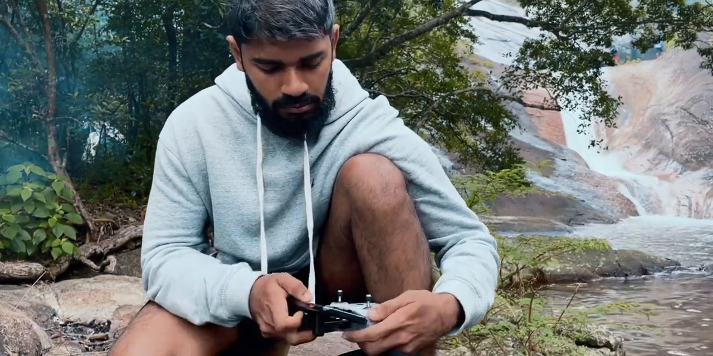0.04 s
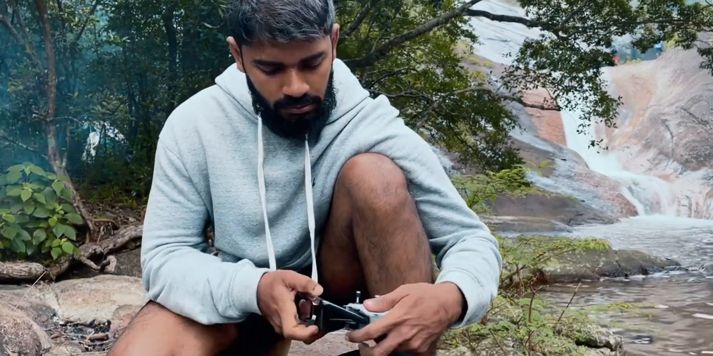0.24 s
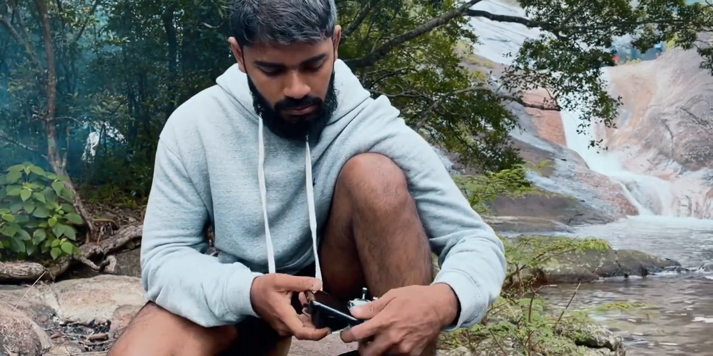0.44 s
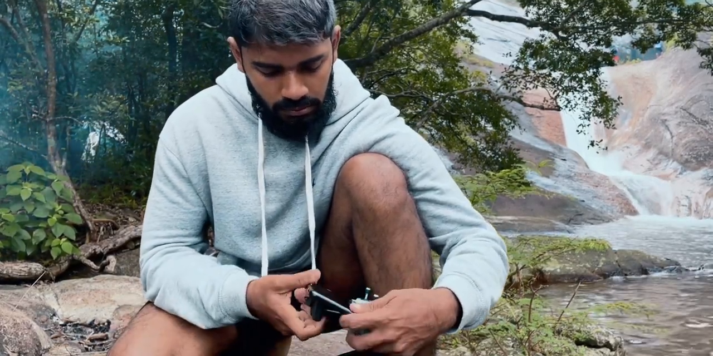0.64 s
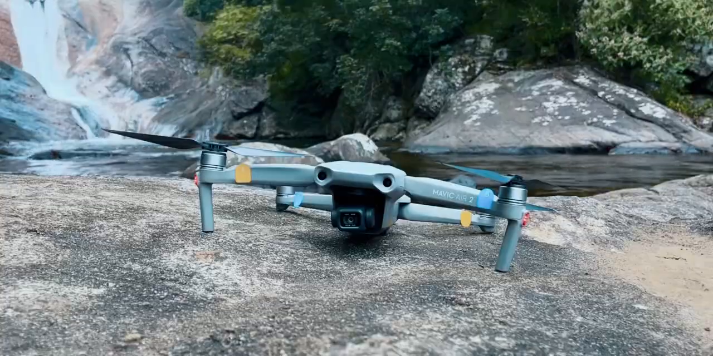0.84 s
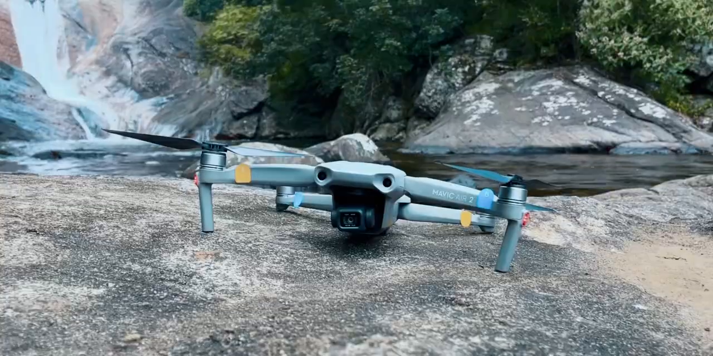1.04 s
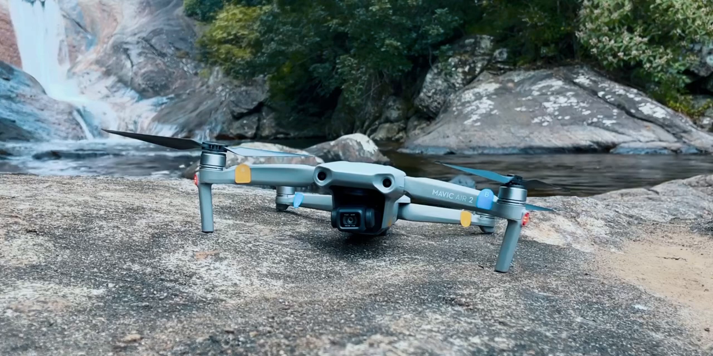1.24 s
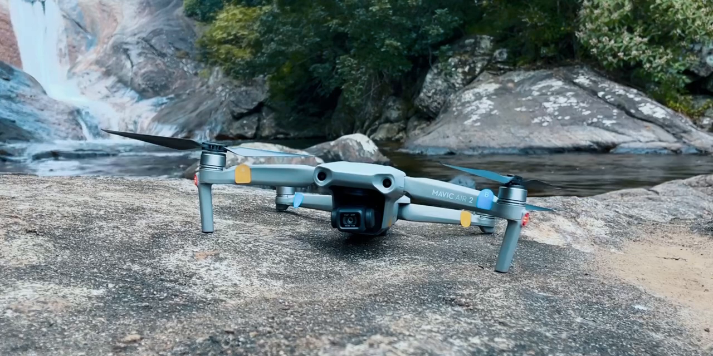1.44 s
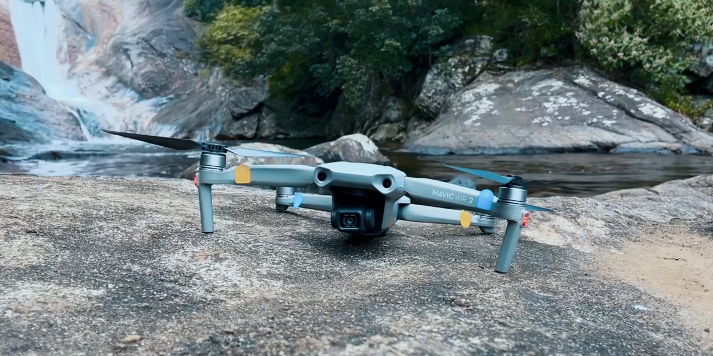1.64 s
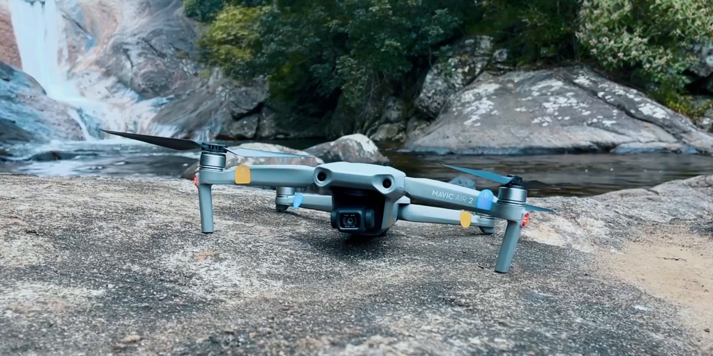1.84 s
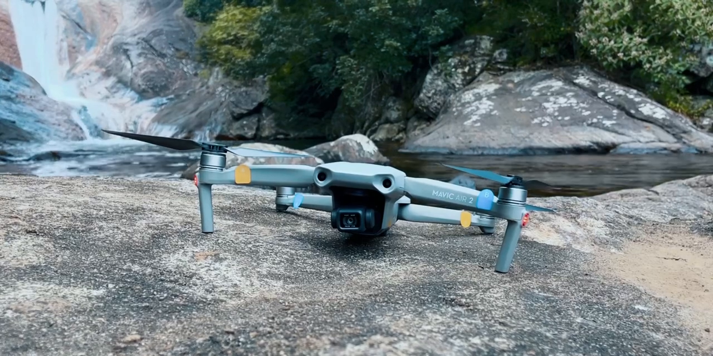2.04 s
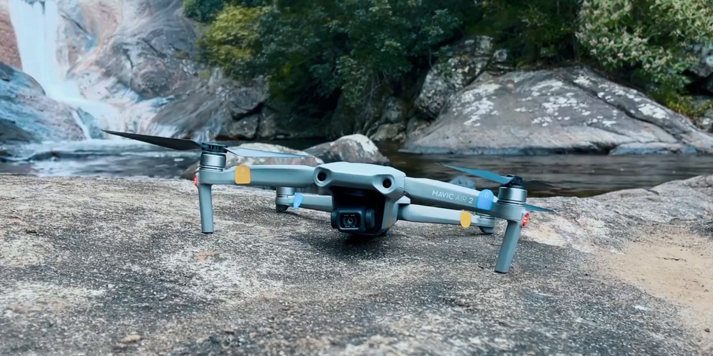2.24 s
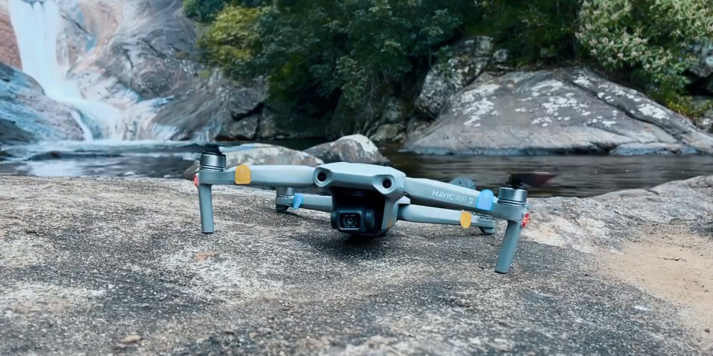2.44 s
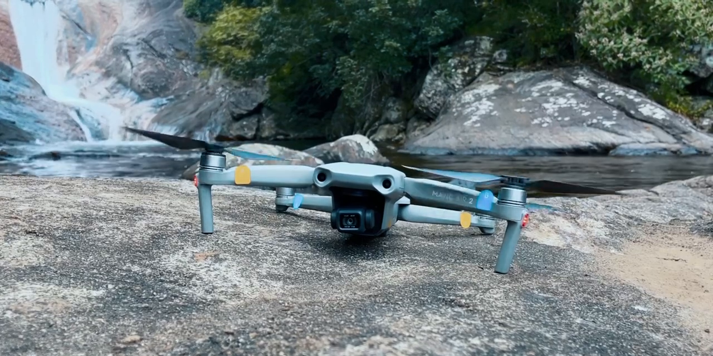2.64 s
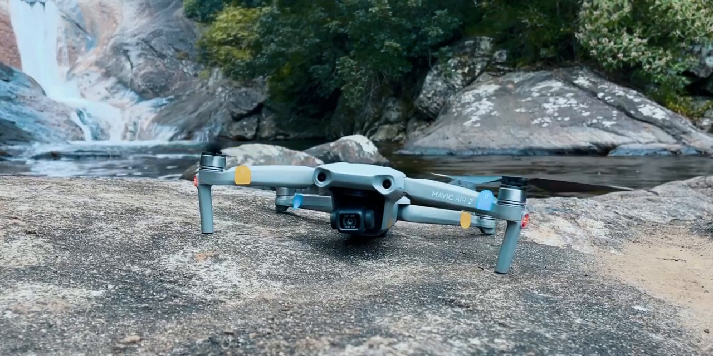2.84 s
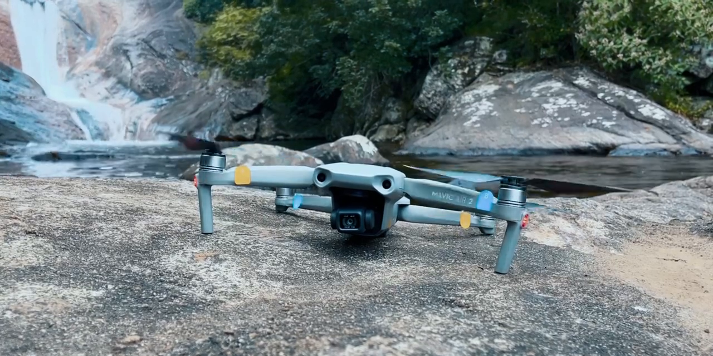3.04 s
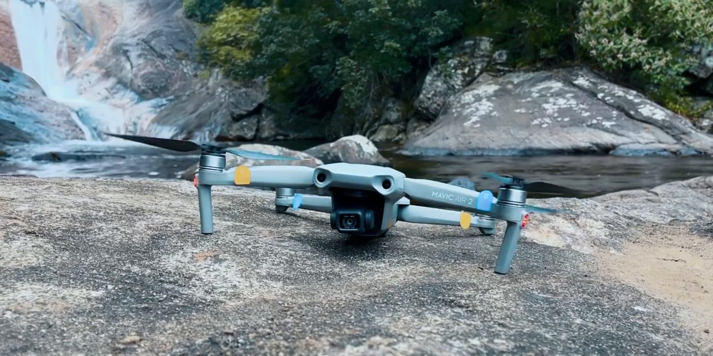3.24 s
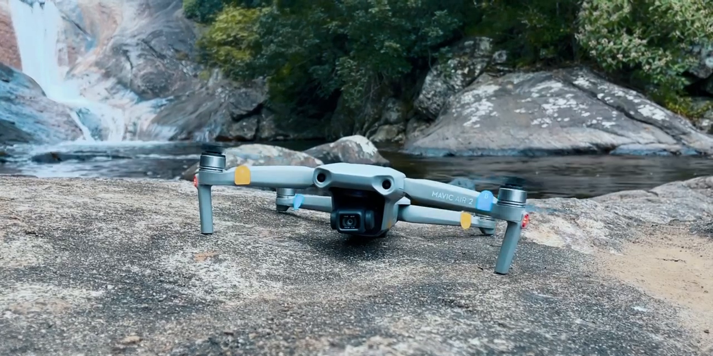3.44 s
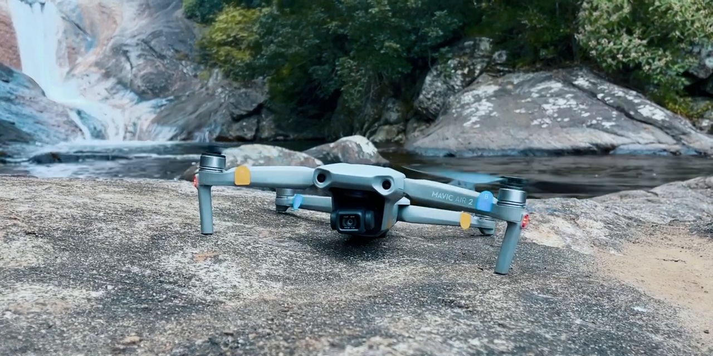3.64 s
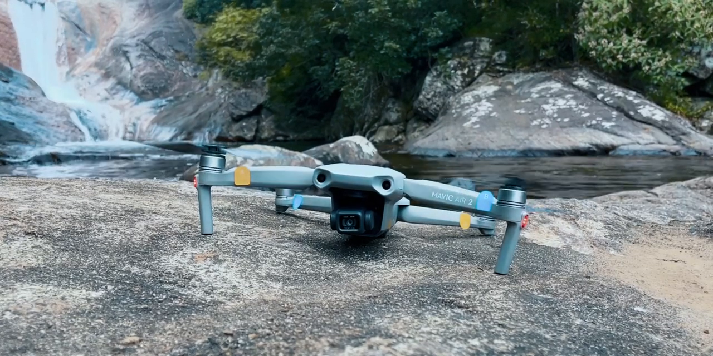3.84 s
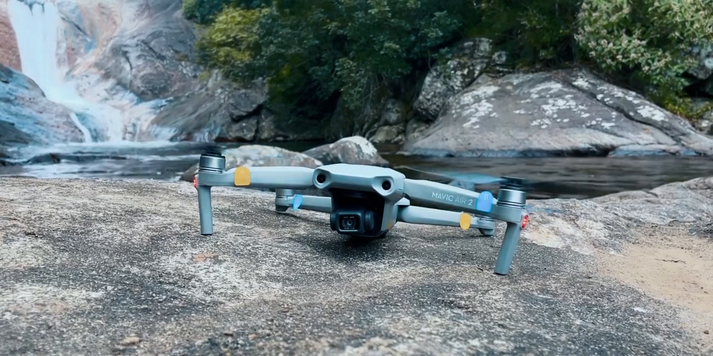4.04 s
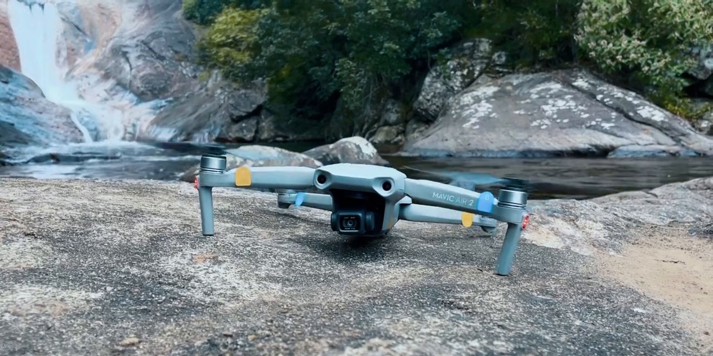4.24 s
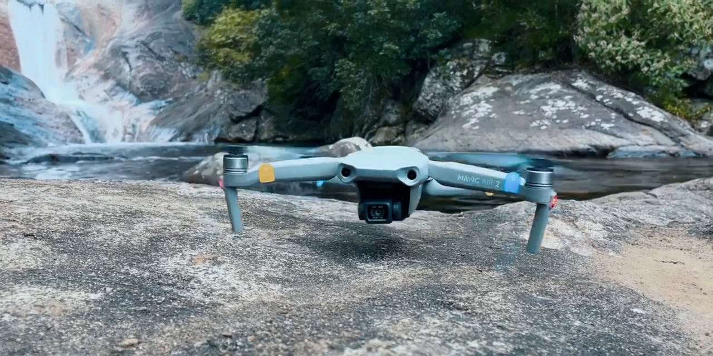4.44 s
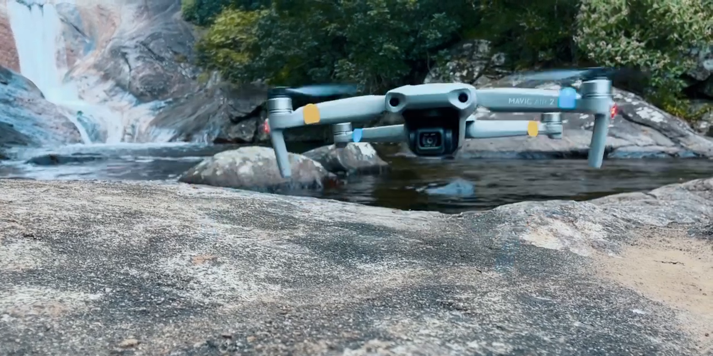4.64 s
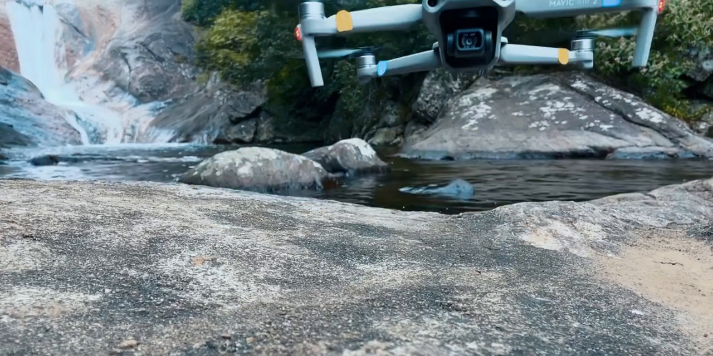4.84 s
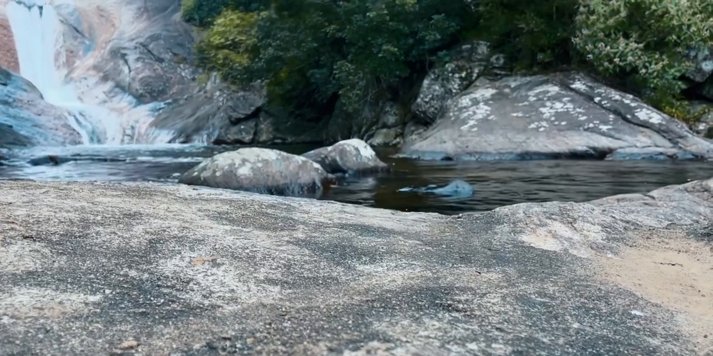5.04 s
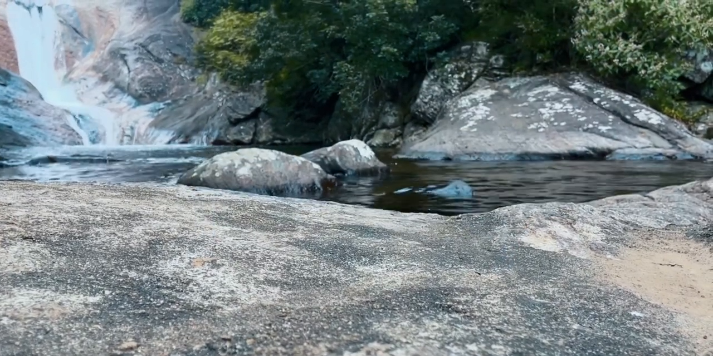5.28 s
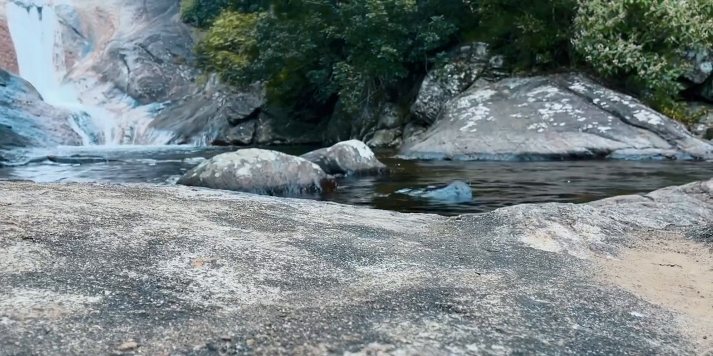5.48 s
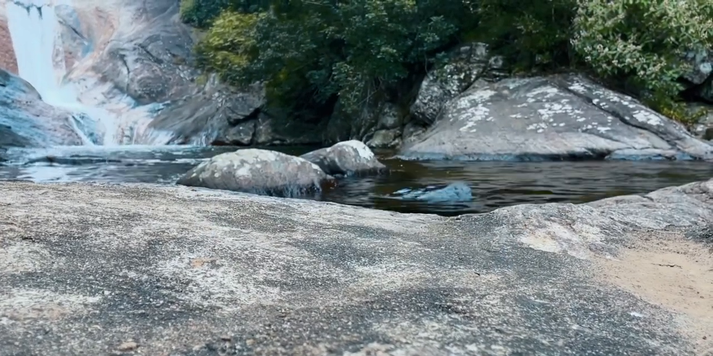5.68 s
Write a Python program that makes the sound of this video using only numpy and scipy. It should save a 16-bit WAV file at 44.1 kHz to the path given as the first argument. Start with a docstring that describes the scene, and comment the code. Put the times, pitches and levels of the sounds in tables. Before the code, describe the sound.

A waterfall roars steadily outdoors while a small drone gives a short test spin, idles, then whines upward and lifts off with buffeting wind.

```python
"""A waterfall roars, at first duller and further right, until a cut to a brighter roar, the microphone facing it.
A small quadcopter on a rock slab gives a short trial spin, idles, then runs up to full throttle and lifts off.
Its four rotors turn at slightly different speeds: each sings in multiples of its blade rate, over a shared hiss.
Their downwash buffets the microphone ports with gusts and eddies; aloft, the slab echoes the rotors."""
import sys
import numpy as np
from scipy import signal
from scipy.fft import rfft, irfft, next_fast_len
from scipy.io import wavfile
from scipy.ndimage import uniform_filter1d, map_coordinates

SR = 44100
rng = np.random.default_rng(int(sys.argv[2]) if len(sys.argv) > 2 else 0)


def master_out(mix):
    """Clip the mix to full scale and print it as 16-bit PCM to the path in sys.argv[1]."""
    frames = np.transpose(np.atleast_2d(mix))
    ceiling = np.clip(frames, -1, 1)
    pcm = np.round(ceiling * 32767).astype(np.int16)
    wavfile.write(sys.argv[1], SR, pcm)


def attenuation_scalar(level_db):
    """Turn a level in dB into a linear amplitude multiplier (20 dB per decade)."""
    decades = np.asarray(level_db, float) / 20
    return 10 ** decades


N = 251811
LIFT_OFF_S = 4.48


def rms_one(x):
    """Normalization: scale a signal to unit root-mean-square."""
    return x / np.sqrt(np.mean(x ** 2) + 1e-20)


def in_time(rows):
    """Linear interpolation: turn each column of a timed table into a curve of samples."""
    s, *columns = np.transpose(rows)
    return [np.interp(np.arange(N) / SR, s, c) for c in columns]


def drift(rate):
    """Random wander: white noise through a double-pole low-pass at rate Hz, brought to spread 1."""
    r = np.exp(-80 * np.pi * rate / SR)  # one step is 40 samples
    noise = rng.standard_normal(N // 40 + 2002)
    slow = signal.lfilter([1], [1, -2 * r, r * r], noise)[2000:]
    return np.interp(np.arange(N) / 40, np.arange(len(slow)), rms_one(slow - slow.mean()))


def coloured(x, spectrum):
    """Linear filtering: multiply the spectrum by a response of (Hz, dB) points, joined over log frequency."""
    size = next_fast_len(N)
    log_hz = np.log(np.arange(size // 2 + 1) * SR / size + 1)
    hz, db = np.transpose(spectrum)
    response = attenuation_scalar(np.interp(log_hz, np.log(hz), db))
    return irfft(rfft(x, size) * response, size)[..., :N]


def stereo_noise(mid, side, side_db):
    """Partial coherence: a shared noise of rms 1 plus an unrelated one of opposite sign at the two ports."""
    both = rms_one(coloured(rng.standard_normal(N), mid))
    apart = rms_one(coloured(rng.standard_normal(N), side))
    return both + attenuation_scalar(side_db) * apart * [[1], [-1]]


def leaning(x, lean):
    """Acoustic shadowing: one port shades the other a little, by frequency."""
    left, right = ([(hz, sign * db / 2) for hz, db in lean] for sign in (1, -1))
    return np.array([coloured(x[0], left), coloured(x[1], right)])


def patchy(x, shared_db, own_db):
    """Amplitude modulation: octave bands swell and flicker, partly together."""
    out, together = 0, drift(15.0)
    for hz in 40 * 2. ** np.arange(9):
        octave = [(hz / 2, -60), (hz / 1.5, -4.6), (hz, 0), (hz * 1.333, -7.6), (hz * 2, -60)]
        band = coloured(x, octave)
        out = out + band * attenuation_scalar(shared_db * together + own_db * drift(19.0))
    return out


def falls(mid, side, lean, level_db, side_db):
    """Broadband turbulence: the roar of falling water as heard from one bearing."""
    return attenuation_scalar(level_db) * leaning(stereo_noise(mid, side, side_db), lean)


# Spectra of the falls, shared by the ports and differing, on both bearings: frequency_hz, relative_db (per Hz)
FALLS_AWAY_SHARED = [(15, -55), (30, -25), (60, -2.5), (205, -6), (480, -12), (800, -18), (1150, -19.5),
                     (2000, -24), (4300, -29.5), (7500, -33), (10500, -37.5), (13500, -37.5)]
FALLS_AWAY_APART = [(25, -43), (57, -23), (329, -4.5), (603, -6.5), (850, -15.5), (1770, -15.5),
                    (2570, -25.5), (6200, -32), (8300, -29), (10100, -38.5), (13300, -36.5), (15700, -40)]
FALLS_FACING_SHARED = [(15, -55), (30, -19), (58, 0.5), (91, 0), (321, -2), (745, -8), (1250, -18),
                       (1620, -16.5), (1880, -24), (2700, -20), (3600, -24), (6110, -28.5), (7400, -32),
                       (10500, -31.5), (13500, -30.5)]
FALLS_FACING_APART = [(25, -30), (48, -18), (101, -12), (195, -8), (603, -2.5), (1560, -12.5), (1750, -16),
                      (2570, -18), (4120, -29.5), (6200, -27.5), (8380, -24.5), (10300, -35), (13300, -32),
                      (15700, -37)]
# Balance of the ports on each bearing: frequency_hz, left_minus_right_db
FALLS_AWAY_LEAN = [(60, 1.5), (180, 1), (520, -4.5), (1510, -2), (4440, 3.5), (13000, -3)]
FALLS_FACING_LEAN = [(60, 0.5), (180, 2), (520, 0), (1510, 3), (4440, 4.5), (13000, -5.5)]


def waterfall():
    """Directional reception: two bearings on the falls, joined by a quick equal-power crossfade at the cut."""
    cut_s = 0.763
    after_cut, = in_time([(cut_s - 0.03, 0), (cut_s + 0.043, 1)])
    away = falls(FALLS_AWAY_SHARED, FALLS_AWAY_APART, FALLS_AWAY_LEAN, level_db=-28.0, side_db=-1)
    facing = falls(FALLS_FACING_SHARED, FALLS_FACING_APART, FALLS_FACING_LEAN, level_db=-27.5, side_db=-4.0)
    roar = np.sqrt(1 - after_cut) * away + np.sqrt(after_cut) * facing
    return patchy(roar, shared_db=0.53, own_db=0.4)


# Gusts of downwash over the ports: start_s, held_s, rumble_db
DOWNWASH_GUSTS = [(3.68, 0.09, -27), (3.95, .03, -28), (4.32, 0.025, -17), (4.49, .13, -7.5),
                  (4.63, .26, -9), (4.96, .18, -21.5), (5.18, .55, -25)]
# Spectrum of the wind rumble: frequency_hz, relative_db (per Hz)
WIND_RUMBLE = [(20, -35), (38, -4), (55, 10.5), (80, 7.5), (120, -3), (200, -4), (500, -22.5),
               (1200, -43.5)]


def downwash():
    """Flow pressure: a low throb nearly alike on both ports; each gust arrives fast, holds and dies away."""
    t = np.arange(N) / SR
    rise_db_per_s, fall_db_per_s = 1500, 400
    gusts_db = []
    for s, held, db in DOWNWASH_GUSTS:
        rise_db = rise_db_per_s * np.maximum(s - t, 0)
        fall_db = fall_db_per_s * np.maximum(t - s - held, 0)
        gusts_db.append(db - rise_db - fall_db)
    rumble_db = np.max(gusts_db, axis=0)
    throb = stereo_noise(WIND_RUMBLE, WIND_RUMBLE, side_db=-12.5)
    throb /= np.sqrt(uniform_filter1d(np.mean(throb ** 2, axis=0), size=1300) + 0.041)  # evens the swings
    return attenuation_scalar(rumble_db + 2.0 * drift(9.3)) * throb


def stray_eddies(count):
    """Random arrivals: lesser eddies at any moment after lift-off, weaker as the craft climbs."""
    when, size, pitch = rng.random((count, 3)).T
    since = when * (N / SR - LIFT_OFF_S - 0.01)
    peak_db = -12.5 - 7 * since - 6 * size  # fades 7 dB per s
    return np.transpose([LIFT_OFF_S + since, peak_db, 90 * 3.0 ** pitch, peak_db - 11])


# The clearest eddies hitting the ports: start_s, peak_db, thump_hz, flutter_db
CLEAR_EDDIES = [(3.682, -13.5, 115, -36), (3.758, -15, 92, -45), (3.809, -21, 177, -38),
                (3.935, -23, 143, -34), (4.31, -13, 219, -24), (4.33, -7.5, 92, -19), (4.489, 2, 222, -21),
                (4.551, 3.5, 129, -15), (4.573, -5, 100, -11.5), (4.605, 5.5, 139, -11.5),
                (4.692, -0.5, 243, -18), (4.711, 1.5, 121, -15), (4.757, -7, 130, -11.5),
                (4.811, -7, 140, -11.5), (4.841, -7, 136, -12), (4.864, -5.5, 145, -14.5),
                (4.881, -8, 110, -14), (4.929, -8, 395, -18.5), (4.964, -6.5, 161, -13.5),
                (5.0, -9.5, 218.8, -18), (5.016, -14, 130, -12), (5.074, -10.5, 492, -29),
                (5.099, -12, 398, -24), (5.117, -18, 416, -18.5), (5.181, -17, 97, -18),
                (5.194, -13, 417, -17.5), (5.288, -9.5, 223, -22.5), (5.328, -15, 450, -20),
                (5.358, -24, 160, -17), (5.4, -25, 98, -21.5), (5.436, -14, 196.2, -21),
                (5.549, -26, 161, -19), (5.636, -19, 168, -23), (5.69, -14, 118, -21)]
# Spectrum of the flutter riding on the eddies: frequency_hz, relative_db (per Hz)
EDDY_FLUTTER = [(250, -6), (450, 3), (800, -4), (1300, -23), (2200, -32)]


def eddies():
    """Vortex passage: a falling swing of pressure in a puff of low noise, with a brighter flutter on top."""
    out, t = np.zeros((2, N)), np.arange(4000) / SR
    flutter = stereo_noise(EDDY_FLUTTER, EDDY_FLUTTER, side_db=-9.5) * attenuation_scalar(1.6 * drift(200.0))
    rows = [*CLEAR_EDDIES, *stray_eddies(count=8)]
    noises = rng.standard_normal((len(rows), 2, 4000))
    for (s, peak_db, hz, flutter_db), (both, apart) in zip(rows, noises):
        length_s = 0.016 * (150 / hz) ** 0.33  # big low eddies last longer
        swell = (1 - np.exp(-t / 0.0024)) * np.exp(-(t / length_s) ** 1.25)
        sos = signal.butter(2, [hz / 1.23, hz * 2.15], "band", fs=SR, output="sos")
        puff = rms_one(signal.sosfilt(sos, both + attenuation_scalar(-12) * apart * [[1], [-1]]))
        swing_hz = hz * (0.585 + 1.2 * np.exp(-t / 0.0085))
        swing = np.sin(2 * np.pi * np.cumsum(swing_hz) / SR) * np.sign(both[0])  # either sign
        thump = (puff + 1.5 * swing) * swell
        # the front edge slaps
        snap = 2.16 * np.sin(2 * np.pi * 800 * t) * np.exp(-((t - 0.003) / 0.00043) ** 2) * np.sign(apart[0])
        at = round(s * SR)
        room = N - at
        bright = flutter[:, at:at + 4000] * swell[:room] ** 1.2 + snap[:room]
        out[:, at:at + 4000] += attenuation_scalar(peak_db) / np.abs(thump).max() * thump[:, :room]
        out[:, at:at + 4000] += attenuation_scalar(flutter_db) * bright / np.sqrt(np.mean(bright[:, :600] ** 2))
    return out


TRIAL_START_S, TRIAL_PEAK_S, TRIAL_END_S = 3.35, 3.52, 3.7
TRIAL_START_HZ, TRIAL_PEAK_HZ, IDLE_HZ = 99.03, 137.2, 111  # blade rates


def blade_rate(opens, full, full_hz, flight):
    """Rotor inertia: trial spin, idle, a run-up that slackens near the top, then the corrections of flight."""
    hz, = in_time([(TRIAL_START_S, TRIAL_START_HZ), (TRIAL_PEAK_S, TRIAL_PEAK_HZ), (TRIAL_END_S, IDLE_HZ)])
    to_go, = in_time([(opens, 1), (full, 0)])
    aloft_hz, = in_time([(full, full_hz), *flight])
    hz = hz + (1 - to_go ** 1.2) * (aloft_hz - IDLE_HZ)
    motor_lag_s = 0.03
    return uniform_filter1d(hz, size=int(motor_lag_s * SR))


# Run-up of the blade rate, one row per rotor: throttle_opens_s, full_speed_s, full_speed_hz
ROTOR_RUN_UPS = [(3.87, 4.51, 255), (3.73, 4.16, 204), (3.89, 4.4, 225)]
# The craft levels itself in the air, blade rates: time_s, first_rotor_hz, second_rotor_hz, third_rotor_hz
FLIGHT_LEVELLING = [(4.68, 253.2, 202, 231.9), (4.84, 240.8, 208, 242.4), (4.99, 236, 210, 229.8),
                    (5.19, 248.5, 219, 224.4), (5.4, 238.7, 214.5, 226.4), (5.71, 233.6, 211, 227.5)]


def rotor_speeds():
    """Blade-passing frequency: the rates of four rotors, the fourth hunting just under the first."""
    s, *flights = np.transpose(FLIGHT_LEVELLING)
    speeds = [blade_rate(*row, zip(s, hz)) for row, hz in zip(ROTOR_RUN_UPS, flights)]
    speeds.append(speeds[0] * (0.97 + 0.012 * drift(2.7)))
    return speeds


# Partials of the blade tone: multiple_of_blade_rate, level_db
BLADE_PARTIALS = [(1, -5), (2, -5.5), (3, -5.5), (4, -8.5), (5, -12.5), (6, -12.5), (7, -16), (8, -18.5),
                  (9, -19), (10, -30.5), (11, -22.5), (12, -23.5), (13, -31), (14, -28), (.5, -17),
                  (1.5, -21.5), (2.5, -19)]
# Tone of each rotor against the common level: trial_db, run_up_db, airborne_db, brightness_db (per octave of multiples)
ROTOR_VOICES = [(0.5, 1.5, 0, 0.2), (-17, 2, -16, -2), (-15, 1.5, -1.5, .5)]


def rotor_tones(speeds, common_db, on):
    """Periodic blade loading: multiples of each blade rate, wavering; also returns the chop of the hiss."""
    aloft, = in_time([(LIFT_OFF_S, 0), (LIFT_OFF_S + 0.5, 1)])
    levels_db = []
    for trial, rising, flying, _ in ROTOR_VOICES:
        own_db, = in_time([(TRIAL_END_S, trial), (TRIAL_END_S + 0.1, rising),
                           (LIFT_OFF_S - 0.1, rising), (LIFT_OFF_S + 0.073, flying)])
        levels_db.append(common_db + own_db)
    levels_db.append(levels_db[0] - 6)
    brightness = [row[-1] for row in [*ROTOR_VOICES, ROTOR_VOICES[0]]]
    tones, chop = np.zeros(N), np.ones(N)
    for hz, level_db, bright_db in zip(speeds, levels_db, brightness):
        phase = (2 * np.pi * np.cumsum(hz * (1 + 0.0028 * drift(25.0))) / SR)[on]
        # slow blades give weak upper multiples; the underside, heard aloft, is brighter
        tilt_db = 2.6 * np.log2(hz / 230) + 0.5 * aloft + bright_db
        for k, partial_db in BLADE_PARTIALS:
            wavering_db = level_db + partial_db + tilt_db * np.log2(k) + 2.5 * drift(24.6)
            tones[on] += attenuation_scalar(wavering_db[on]) * np.sin(k * phase + rng.uniform(0, 2 * np.pi))
        chop[on] += 0.097 * np.cos(phase)
    return tones, chop


# Spectra of the hiss, shared by the ports and differing: frequency_hz, relative_db (per Hz)
HISS_SHARED = [(150, -30), (400, -2.5), (800, -20.5), (2000, -23), (4000, -20), (6500, -24), (7500, -29),
               (9300, -25), (11000, -22.5), (13500, -28)]
HISS_APART = [(150, -3.5), (400, -3), (800, -6.5), (2000, -15), (4000, -16.5), (5000, -12.5), (6200, -15.5),
              (8300, -9), (10300, -17), (13500, -22), (15700, -19)]
# Balance of the ports for the hiss: frequency_hz, left_minus_right_db
HISS_BALANCE = [(60, 0.0), (180, -4), (520, 5.5), (1510, 9), (4440, 3), (13000, -2.5)]


def rotor_hiss(first_hz, hiss_db, chop):
    """Blade turbulence: noise chopped at the blade rates, its treble rising with speed, then as it passes overhead."""
    hiss = stereo_noise(HISS_SHARED, HISS_APART, side_db=-4) * chop
    middle = signal.butter(2, [2000, 7000], "band", fs=SR, output="sos")
    hiss /= np.std(signal.sosfilt(middle, hiss[0]))
    high = coloured(hiss, [(6000, -60), (8500, 0)])
    aloft_s = np.maximum(np.arange(N) / SR - LIFT_OFF_S, 0)
    trial_db, = in_time([(TRIAL_START_S, 0), (TRIAL_PEAK_S, 6.5), (TRIAL_END_S, 0)])  # the trial spin is sharp
    high_db = -5 + 3.5 * np.log2(first_hz / IDLE_HZ) + 6.5 * aloft_s + trial_db
    hiss = attenuation_scalar(hiss_db) * (hiss - high + attenuation_scalar(high_db) * high)
    return leaning(hiss, HISS_BALANCE)


# Echo off the slab as the craft climbs: time_s, delay_ms, share (0-1)
SLAB_REFLECTION = [(4.7, 0.25, 0.), (4.9, 0.36, 0.07), (5.0, 0.33, 0.46), (5.15, 0.37, 0.53),
                   (5.4, 0.39, 0.35), (5.71, 0.42, 0.37)]


def slab_echo(x):
    """Comb interference: the rock returns the rotors' underside, opposite in sign, later and duller."""
    delay_ms, share = in_time(SLAB_REFLECTION)
    late = np.arange(N) - delay_ms * SR / 1000
    dull = coloured(x, [(900, -14), (1900, 0), (4000, 0), (5500, -14)])
    return x - share * np.array([np.interp(late, np.arange(N), c) for c in dull])


# Rotor loudness at the microphone: time_s, hiss_db, tone_db
ROTOR_THRUST = [(3.3, -60, -50), (3.42, -42, -28), (3.52, -40.5, -24.5), (3.62, -43, -24.5),
                (3.7, -47, -55), (3.88, -44, -34), (4.15, -34.5, -25), (4.33, -28, -20.5),
                (4.46, -27.5, -18), (4.6, -29, -20), (4.75, -28, -18.5), (5.0, -27.5, -26.5),
                (5.15, -31, -29), (5.4, -34, -28), (5.6, -37.5, -33), (5.71, -35, -41.5)]


def rotors():
    """Superposition: blade tones and hiss of all four rotors, direct and reflected from the slab."""
    hiss_db, tone_db = in_time(ROTOR_THRUST)
    running, = in_time([(3.3, 0), (3.4, 1)])
    speeds = rotor_speeds()
    tones, chop = rotor_tones(speeds, tone_db, running > 0)
    hiss = rotor_hiss(speeds[0], hiss_db, chop)
    late_tones = map_coordinates(tones, [np.arange(N) - 3.0], order=1)  # the right port hears them a little late
    return running * slab_echo(hiss + np.array([tones, late_tones]))


def scene():
    """Linear superposition: falls, wind on the ports and rotors add."""
    return waterfall() + downwash() + eddies() + rotors()


# Gaps in the treble, of the sum near 8 kHz and above 13.7 kHz, of the difference near 12 kHz:
# frequency_hz, response_db
SUM_GAPS = [(7500, 0), (7700, -20.5), (8800, -12.5), (9000, -3.5), (13100, -2), (13300, -15), (13700, -8),
            (13850, -38)]
DIFFERENCE_GAPS = [(10300, -0.5), (10500, -35), (12900, -35), (13150, -0.5)]


def treble_gaps(x):
    """Band rejection: the sum and the difference of the channels each lack bands of treble."""
    both = coloured(x[0] + x[1], SUM_GAPS) / 2
    apart = coloured(x[0] - x[1], DIFFERENCE_GAPS) / 2
    return both + apart * [[1], [-1]]


def gain_control(x):
    """Automatic gain control: loud passages pull the gain down quickly; it creeps back."""
    knee_db, share, recovers_db_per_s, attack_s = -20, 0.25, 2, 0.018
    climb = recovers_db_per_s * np.arange(N) / SR
    level_db = 10 * np.log10(uniform_filter1d(np.mean(x ** 2, axis=0), size=900) + 1e-12)
    cut_db = np.maximum.accumulate(share * np.maximum(level_db - knee_db, 0) + climb) - climb
    r = np.exp(-1 / (attack_s * SR))
    return x * attenuation_scalar(-signal.lfilter([1 - r], [1, -r], cut_db))


def band_limit(x):
    """A steep low-pass at the top of the band."""
    return signal.sosfilt(signal.butter(12, 15780, fs=SR, output="sos"), x)


def record(dry):
    """Reception chain: treble gaps, gain control, then soft saturation that rounds the peaks."""
    level = gain_control(treble_gaps(dry))
    mix = np.tanh(level / 0.98) * 1.087
    return band_limit(mix)


dry = scene()
out = record(dry)
master_out(out)
```